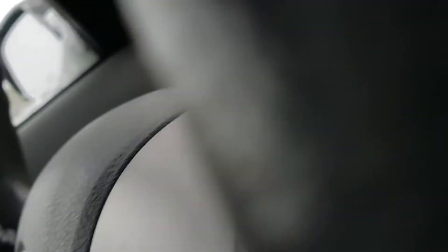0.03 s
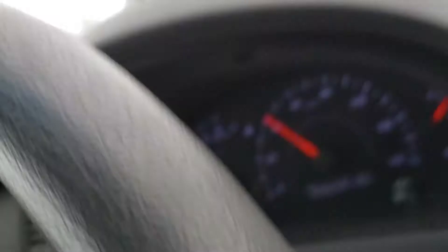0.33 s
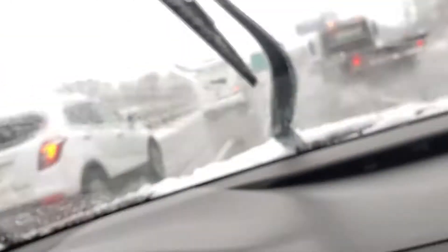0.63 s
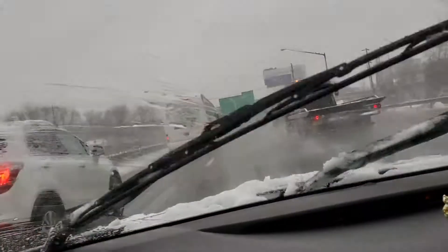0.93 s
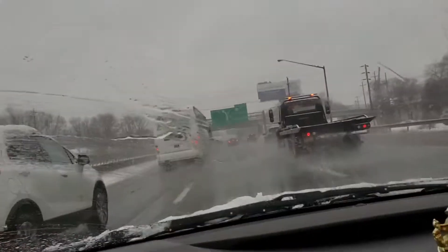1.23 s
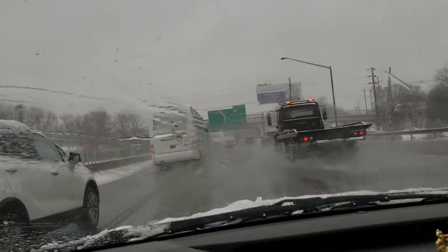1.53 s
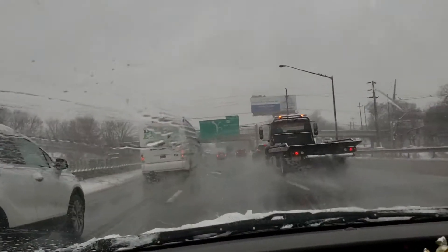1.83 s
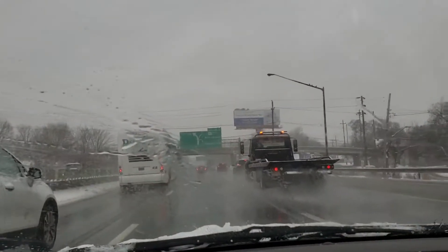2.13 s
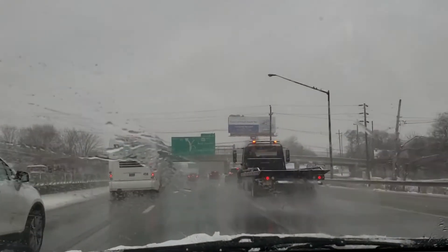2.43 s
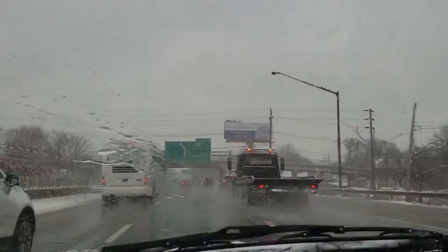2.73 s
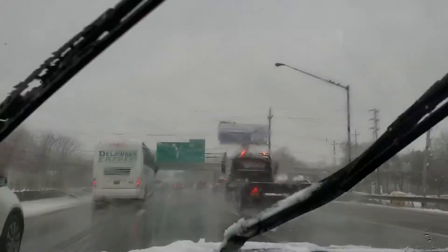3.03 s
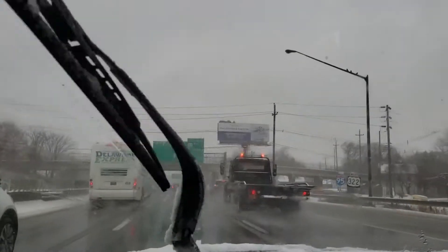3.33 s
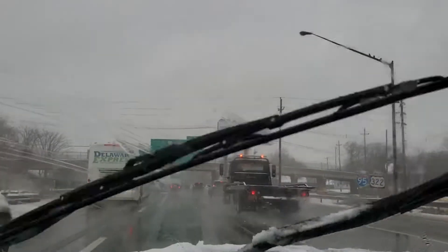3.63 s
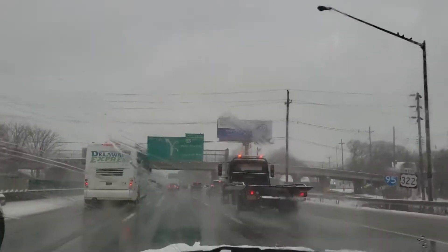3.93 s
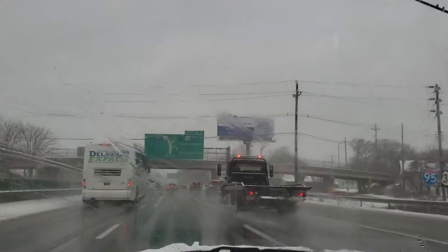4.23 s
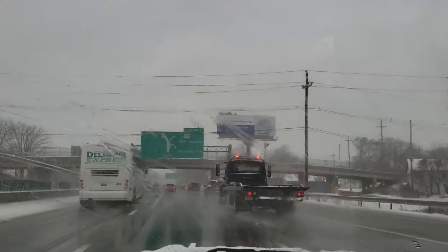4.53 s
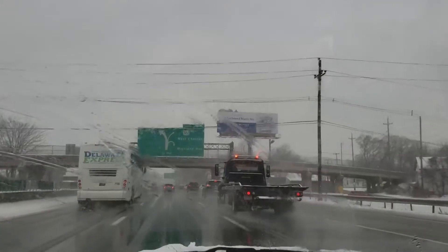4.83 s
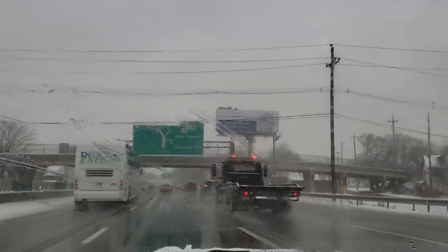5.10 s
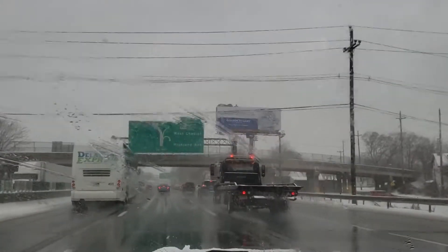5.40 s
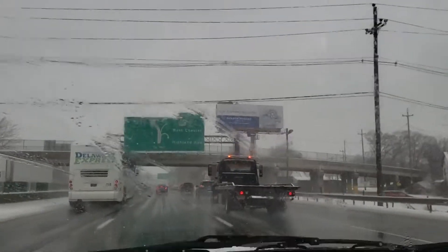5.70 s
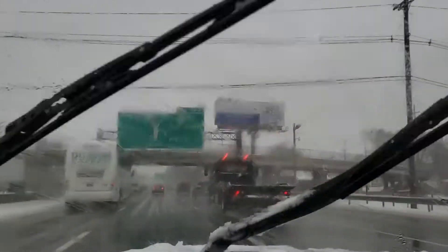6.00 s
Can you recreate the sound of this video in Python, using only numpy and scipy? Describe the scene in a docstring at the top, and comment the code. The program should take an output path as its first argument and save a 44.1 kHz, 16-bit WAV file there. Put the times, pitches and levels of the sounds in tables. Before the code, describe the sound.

A steady low rumble, tyre roar, wet spray hiss and engine hum are heard from inside a car for about six seconds. In the first half second the hand-held phone is swung up with bumps, hollow finger knocks, rubbing, clicks and a dull rush of air, over a soft wiper sweep lasting a second. Small ticks and a thud follow near 1.2 seconds. After a faint squeak at 2.5, the wipers sweep again from 2.8 to 3.8 with a rubbery swish, motor hum and thin whistle. Around 3 seconds a passing vehicle gently swells the roar and hiss, its faint tyre whine sinking near 3.5 as mist fizzes lightly on the glass. The engine hums louder from 3 to 4.5. Dull road thuds come between 2.8 and 3.6, then with plastic ticks from 4.7 to 5. A third wiper sweep starts at 5.7.

```python
"""Car cabin on a wet highway

The cabin booms over the road, tyres roar, spray hisses and the engine hums.
A vehicle passes with a sinking tread whine and throws mist on the glass.
The wipers start three sweeps, wheels thud over joints and plastic trim ticks.
A hand-held phone is swung up at the start; it rumbles, rubs and clicks in the grip."""
import sys
import numpy as np
from scipy import signal
from scipy.fft import rfft, irfft, next_fast_len
from scipy.io import wavfile
from scipy.ndimage import uniform_filter1d, map_coordinates

SR = 44100
rng = np.random.default_rng(int(sys.argv[2]) if len(sys.argv) > 2 else 0)


def store_pcm(level_fs):
    """Save levels as 16-bit WAV."""
    pcm = np.round(np.clip(level_fs, -1, 1) * 32767).astype(np.int16)
    wavfile.write(sys.argv[1], SR, np.atleast_2d(pcm).T)


N = 267246
TIME = np.arange(N) / SR

# Cabin air and body resonances: f/Hz, width/Hz, level/dB
CABIN_MODES = [(43, 16, 2.5), (78.2, 19.6, -6), (104.9, 13, -3.5), (162.6, 15, -20.5)]
# Jolts of body, wiper linkage and hand: t/s, level/dB, length/s, corner/Hz
JOLT_EVENTS = [(0.05, -21, 0.049, 110), (0.103, -16.5, 0.05, 140), (0.156, -19.5, 0.03, 125),
               (0.203, -20, 0.074, 75), (0.296, -17, 0.034, 86), (.361, -23, 0.082, 65),
               (1.135, -31, 0.13, 150), (1.344, -23.5, 0.071, 120), (2.848, -21.5, 0.02, 200),
               (2.915, -29, 0.094, 150), (3.187, -24, 0.031, 100), (3.296, -27, 0.25, 160),
               (3.543, -21, 0.079, 88), (4.721, -22, 0.038, 320), (4.771, -20.5, 0.045, 52),
               (4.901, -20.5, 0.057, 62), (4.968, -23.5, 0.079, 55.3), (5.191, -31, 0.11, 48)]
# Wiper sweeps: t/s, swish/dB, whistle/dB, motor/dB
WIPER_SWEEPS = [(.03, -54, -66, -62), (2.77, -54, -54.5, -49), (5.74, -54.5, -73, -62)]
# Trim and case ticks: t/s, level/dB, treble/dB (-10 = no tilt), L-R/dB, t60/s, resonance/Hz
TICK_EVENTS = [(0.104, -43, -10, -2, 0.092, 4200), (0.3238, -39, -4, 2, 0.066, 4300),
               (0.3265, -40, -22, 5, .02, 4540), (.378, -51, -14, 3, 0.064, 3600),
               (.4595, -49.5, -14, 7, .025, 4200), (0.813, -44.5, -12.5, -1, .07, 3400),
               (1.151, -39.5, -17.5, -2, 0.076, 3350), (1.335, -48, -4, -3, .008, 4200),
               (1.669, -49, -21, -1, .08, 3500), (2.9235, -48, -21, .5, .1, 4150),
               (2.9825, -53, -7, 1, .06, 4200), (3.987, -53, -13, .5, .09, 4200),
               (4.745, -52, -16, 4, .05, 4200), (4.7705, -45.5, -15, 3, .055, 4900),
               (4.8185, -47, -7, .5, .045, 4900), (4.837, -53, -5, 0, 0.04, 4900),
               (4.853, -56, -10, 1, .1, 4200), (5.9602, -49.5, -16, 1.5, .08, 4200)]
# Finger knocks: t/s, level/dB, f/Hz
FINGER_KNOCKS = [(.178, -26, 630), (.387, -30.5, 670), (.419, -27, 697)]
# Finger slides: t/s, level/dB, length/s
FINGER_RUBS = [(0.018, -54.5, 0.095), (0.104, -52, 0.062), (.17, -57, 0.13), (.33, -60.5, 0.24),
               (1.2, -57.5, .069), (3.55, -56, .045), (3.976, -58, .025), (4.313, -57, .012),
               (4.755, -58, 0.04), (4.795, -58, 0.035), (4.84, -65, 0.15), (5.96, -64, 0.085)]
# Relative noise spectra: f/Hz, level/dB
TYRE_SPECTRUM = [(60, -2.5), (140, -3), (210, -2), (330, 0.5), (480, -4.5), (590, -3), (660, -7.5),
                 (740, -4.5), (890, -10.5), (1050, -8.5), (1400, -13.5), (2000, -31), (4000, -62)]
SPRAY_SPECTRUM = [(600, -12.5), (1200, -3), (1650, 0), (2100, -1), (2700, -2), (3400, -3.5), (4100, -6.5),
                  (4800, -15.5), (6000, -19), (7200, -21.5), (8500, -28), (10000, -29), (13000, -28),
                  (16000, -36)]
BLADE_UP_SPECTRUM = [(300, -10), (600, 18), (1100, 26), (1500, 22), (2100, 9), (3600, 19), (5000, 0),
                     (7300, -5), (9000, -9), (13000, 0), (16000, -6)]
BLADE_BACK_SPECTRUM = [(300, 11), (600, 18), (1200, 26), (1800, 16), (3000, 14), (4400, 12), (5200, -2),
                       (7300, 5), (9000, -6.5), (13000, -2), (16000, -6)]
LIP_FLIP_SPECTRUM = [(800, -12), (2000, 6), (3400, -8), (4300, -4), (5500, -20.5), (7200, -8), (8200, -13),
                     (9500, -24), (16000, -24)]
AIR_SPECTRUM = [(60, -6), (140, -3), (210, 1.5), (310, 1), (430, -5.5), (620, -5), (850, -6.5),
                (1100, -10.5), (1500, -16), (2100, -38), (4000, -60)]
PLASTIC_SPECTRUM = [(1500, -22), (2800, -12), (3400, 1), (4200, 3), (4900, -0.5), (6000, -1.5), (7000, -2),
                    (8300, -5.5), (10000, -6.5), (12500, -2.5), (14000, -2), (15500, -3)]
SKIN_SPECTRUM = [(400, -12), (700, 0), (1100, -4), (1500, -6), (2200, 4), (4500, 6), (7200, 2.5),
                 (9500, -6), (11200, 0), (13000, 2), (14200, -2), (15800, -7)]
MIST_SPECTRUM = [(3000, -30), (6000, -1), (10000, -2), (12500, 0), (16000, -5)]
# Likeness of the two microphone ports: f/Hz, correlation
PORT_CORRELATION = [(40, .99), (90, .9), (400, .88), (600, 0.57), (730, 0.1), (950, 0.3), (1150, -0.38),
                    (1520, -0.35), (1750, 0), (2250, 0.37), (2750, -0.08), (5000, 0), (15000, -0.08)]
# Port balance: f/Hz, L-R/dB
PORT_BALANCE = [(40, 3.5), (90, 2.5), (160, 4), (230, 1.5), (580, 1.7), (750, 0.5), (3200, 0.2), (4200, -3),
                (4900, 1), (6000, 0), (7200, 7.5), (8500, -1), (11000, 0.5), (13000, -3.5), (15500, -1)]


def amp(db):
    """Decibels to gain."""
    return 10 ** (np.asarray(db) / 20)


def unit(x):
    """Scale to rms 1."""
    return x / np.sqrt(np.mean(x ** 2) + 1e-20)


def along(points, hz):
    """Interpolate (f/Hz, value) points on a log axis."""
    f, v = np.transpose(points)
    return np.interp(np.log(hz + 1), np.log(f + 1), v)


def colour(points):
    """Response of an (f/Hz, level/dB) spectrum."""
    return lambda hz: amp(along(points, hz))


def wobble(rate_hz):
    """Smooth random curve."""
    return map_coordinates(rng.standard_normal(int(N * rate_hz / SR) + 4), [TIME * rate_hz])


def stroke(t, length_s, edge_s):
    """Linear rise, hold, exponential decay."""
    return np.clip(t / edge_s, 0, 1) * np.exp(-np.maximum(t - length_s, 0) / edge_s)


def filtered(x, response):
    """Apply a complex frequency response."""
    size = next_fast_len(N + SR // 2)
    return irfft(rfft(x, size) * response(np.fft.rfftfreq(size, 1 / SR)), size)[..., :N]


def rush(response, patchy_db):
    """Diffuse stereo noise, rms 1, with patches of random gain."""
    spectra = signal.stft(rng.standard_normal((2, N)), nperseg=512)[2]
    patches = uniform_filter1d(rng.standard_normal(spectra.shape[1:]), size=6, axis=0)
    patches = uniform_filter1d(patches, size=14, axis=1)
    pair = signal.istft(spectra * amp(patchy_db * unit(patches)), nperseg=512)[1][:, :N]
    angle = lambda hz: np.arccos(np.clip(along(PORT_CORRELATION, hz), -1, 1)) / 2
    mid, side = filtered(pair, lambda hz: response(hz) * np.array([np.cos(angle(hz)), np.sin(angle(hz))]))
    return unit(np.array([mid + side, mid - side]))


def fuzzy_tone(hz, width_hz):
    """Tone, rms 1; level and phase wander separately per port."""
    a, b = filtered(rng.standard_normal((2, 2, N)), lambda f: 1 / (1 + (f / width_hz) ** 4))
    phase = 2 * np.pi * np.cumsum(hz * np.ones(N)) / SR
    return unit(a * np.cos(phase) + b * np.sin(phase))


def nearness(before_s, after_s, nearest_s=3.02):
    """Bell curve, 1 when the passing vehicle is nearest."""
    t = TIME - nearest_s
    return np.exp(-(t / np.where(t < 0, before_s, after_s)) ** 2)


def cabin(hz):
    """Response of the cabin's low modes, leaking away below the first."""
    modes = sum(amp(db) * 1j * hz * width / (f * f - hz * hz + 1j * hz * width)
                for f, width, db in CABIN_MODES)
    return modes * (1 - 1 / (1 + (hz / 31) ** 12)) / (1 + (hz / 215) ** 4)


def road(coarsening_db_per_s=0.22, drying_db_per_s=0.16):
    """The road shakes the cabin; tyre roar and spray swell as the vehicle passes."""
    passing_db = 2.5 * nearness(0.39, 1)
    shade_db = 2 * stroke(TIME - 0.14, 0.35, edge_s=0.097)  # a hand shades the ports
    roar_db = -38.5 + coarsening_db_per_s * TIME + passing_db
    spray_db = -45.5 - drying_db_per_s * TIME + passing_db - shade_db
    boom = amp(-31 + 0.45 * wobble(7)) * rush(cabin, patchy_db=0)
    roar = amp(roar_db) * rush(colour(TYRE_SPECTRUM), patchy_db=0.98)
    spray = amp(spray_db) * rush(colour(SPRAY_SPECTRUM), patchy_db=0.82)
    return boom + roar + spray


def jolts(evenness=0.83):
    """Jolts shake the cabin modes; each has its own brightness, from dull thud to knock."""
    out, t = np.zeros(N), np.arange(SR // 2) / SR
    hz = np.fft.rfftfreq(len(t), 1 / SR)
    for start_s, db, length_s, corner_hz in JOLT_EVENTS:
        response = cabin(hz) * (1 + hz / 150) / (1 + (hz / corner_hz) ** 2)
        shake = irfft(rfft(rng.standard_normal(len(t))) * response, len(t))
        # even out chance swells so the push sets the strength
        local_rms = np.sqrt(abs(uniform_filter1d(shake ** 2, size=2000, mode="wrap")))
        push = stroke(t, length_s, edge_s=0.012)
        thud = unit(push * shake / local_rms ** evenness) * np.sqrt(np.mean(push ** 2))
        start = round(start_s * SR)
        out[start:start + len(t)] += amp(db) * thud[:N - start]
    return out


def engine(firing_hz=80.96, drift=0.01214, throttle_db=8):
    """Slightly unsteady firing hum, louder during one push on the throttle."""
    phase = 2 * np.pi * np.cumsum(firing_hz * (1 + drift * wobble(5.01))) / SR
    throttle = stroke(TIME - 3, 1.42, edge_s=0.29)
    return amp(-43 + throttle_db * throttle + 0.69 * wobble(6.6)) * unit(np.sin(phase))


def tread(coming_hz=605, going_hz=560, glide_at_s=3.46, glide_s=0.123):
    """Passing tread blocks slap the road: a blurred note that sinks as they draw away."""
    hz = going_hz + (coming_hz - going_hz) * (1 - np.tanh((TIME - glide_at_s) / glide_s)) / 2
    steady = np.sin(2 * np.pi * np.cumsum(hz + 5 * wobble(20)) / SR)
    note = unit(steady + 0.62 * fuzzy_tone(hz, width_hz=6.4)[0])  # long waves: both ports alike
    octave = amp(-13) * fuzzy_tone(2 * hz, width_hz=11)
    return amp(-52) * nearness(1, 2.3) * (note + octave)


def wipers(sweep_s=1.04, flip_s=0.475, whistle_hz=2030, rise_hz=500, return_db=1):
    """Rubber swishes through water, whistles going up, flips its lip and returns brighter."""
    up, back, whistle, flip = np.zeros((4, N))
    for start_s, swish_db, whistle_db, _ in WIPER_SWEEPS:
        t = TIME - start_s
        progress = np.clip(t / sweep_s, 0, 1)
        speed = np.sin(2 * np.pi * progress)  # positive going up
        turn = np.sin(np.pi * progress)  # sustains the swish at the top
        rub = amp(swish_db + return_db * progress) * np.hypot(speed, turn)
        flipped = np.clip((t - flip_s) / 0.03, 0, 1)
        up += rub * np.sqrt(1 - flipped)
        back += rub * np.sqrt(flipped)
        flip += amp(whistle_db + 8) * stroke(t - flip_s, 0.026, edge_s=0.009)
        hz = whistle_hz + rise_hz * np.minimum(2 * progress, 1) ** 5 + 25 * wobble(8.8)
        whistle += amp(whistle_db) * np.maximum(speed, 0) * fuzzy_tone(hz, width_hz=60)[0]
    swish = up * rush(colour(BLADE_UP_SPECTRUM), patchy_db=1.5)
    swish += back * rush(colour(BLADE_BACK_SPECTRUM), patchy_db=1.5)
    flutter = amp(2 * wobble(35))
    return flutter * (swish + whistle) + flip * rush(colour(LIP_FLIP_SPECTRUM), patchy_db=0)


def wiper_motor(start_hz=613, sag_hz_per_s=30.2, delay_s=0.043, load_s=0.55):
    """Rough motor hum, slowing under the load of the blades."""
    out = np.zeros(N)
    for start_s, _, _, db in WIPER_SWEEPS:
        t = TIME - start_s - delay_s
        hz = start_hz - sag_hz_per_s * np.clip(t, 0, 1) + 5 * wobble(22)
        hum = np.sin(2 * np.pi * np.cumsum(hz) / SR) + fuzzy_tone(hz, width_hz=16)[0]
        out += amp(db) * stroke(t, load_s, edge_s=0.049) * unit(hum)
    return out


def phone_swing(length_s=0.24, fade_s=0.12):
    """Dull rush of air on the ports, fading as the phone comes to rest."""
    motion = np.exp(-np.maximum(TIME - length_s, 0) / fade_s)
    return amp(-36.5) * motion * rush(colour(AIR_SPECTRUM), patchy_db=1.3)


def knocks(t60_s=0.045, rise_s=0.0013):
    """A fingertip gives the phone a short, hollow ring."""
    out, t = np.zeros(N), np.arange(SR // 10) / SR
    for start_s, db, hz in FINGER_KNOCKS:
        envelope = amp(db - 60 * t / t60_s) * (1 - np.exp(-t / rise_s))
        out[round(start_s * SR):][:len(t)] += envelope * np.sin(2 * np.pi * hz * t)
    return out


def ticks(rise_s=0.0024, ring_db=7.5, ring_width_hz=120):
    """Small plastic contacts: damped scrapes, each with its own resonance."""
    out, t = np.zeros((2, N + SR)), np.arange(SR // 8) / SR
    hz = np.fft.rfftfreq(len(t), 1 / SR)
    for start_s, db, treble_db, pan_db, t60_s, ring_hz in TICK_EVENTS:
        envelope = np.minimum(t / rise_s, 1) * amp(-60 * np.maximum(t - rise_s, 0) / t60_s)
        tilt = amp((treble_db + 10) * along([(7000, 0.058), (12000, 0.93)], hz))
        resonance = amp(ring_db / (1 + ((hz - ring_hz) / ring_width_hz) ** 2))
        response = colour(PLASTIC_SPECTRUM)(hz) * resonance * tilt
        scrape = unit(irfft(rfft(rng.standard_normal((2, len(t)))) * response, len(t)))
        pan = amp([[pan_db / 2], [-pan_db / 2]])
        out[:, round(start_s * SR):][:, :len(t)] += amp(db) * pan * scrape * envelope
    return out[:, :N]


def grip(slips_per_s=1800, slip_s=0.0012, spread_db=2.5):
    """Skin sticks and slips on the case in many tiny, uneven steps."""
    pressure = sum(amp(db) * stroke(TIME - start_s, length_s, edge_s=0.0098)
                   for start_s, db, length_s in FINGER_RUBS)
    slip_energy = (rng.random(N) < slips_per_s / SR) * amp(spread_db * rng.standard_normal(N)) ** 2
    grain = np.sqrt(signal.lfilter([1], [1, -np.exp(-1 / (slip_s * SR))], slip_energy))
    return pressure * unit(grain) * rush(colour(SKIN_SPECTRUM), patchy_db=1)


def squeak(start_s=2.5, length_s=0.027, hz=2570):
    """A faint, brief high chirp, just before the second wiper sweep."""
    return amp(-52) * stroke(TIME - start_s, length_s, edge_s=0.009) * fuzzy_tone(hz, width_hz=25)[0]


def drone(start_s=3.88, length_s=1.45, hz=390.5):
    """A faint, blurred note rises out of the roar."""
    return amp(-49) * stroke(TIME - start_s, length_s, edge_s=0.37) * fuzzy_tone(hz, width_hz=20)[0]


def mist(start_s=2.84, length_s=0.66):
    """Droplets in the vehicle's wake fizz on the windscreen and thin out."""
    wake = stroke(TIME - start_s, length_s, edge_s=0.35)
    return amp(-65.5 + 1.5 * wobble(60)) * wake * rush(colour(MIST_SPECTRUM), patchy_db=4)


def ports(hz, bass_hz=200, lag_s=0.00034):
    """Each port has its own colour; bass reaches the left one later."""
    lag_rad = 2 * np.pi * hz * lag_s / (1 + (hz / bass_hz) ** 4)
    balance = amp(np.outer([1, -1], along(PORT_BALANCE, hz)) / 2)
    return balance * np.exp(1j * np.outer([-1, 1], lag_rad) / 2)


def scene():
    """All sources at the two ports."""
    car = road() + tread() + engine() + jolts() + wipers() + wiper_motor()
    handling = phone_swing() + grip() + knocks()
    background = mist() + squeak() + drone()
    return ticks() + filtered(car + handling + background, ports)


def record(dry, low_hz=28, top_hz=15830):
    """The phone cuts deep bass and everything above its band limit."""
    return filtered(dry, lambda hz: (1 - 1 / (1 + (hz / low_hz) ** 10)) * (hz < top_hz))


dry = scene()
out = record(dry)
store_pcm(out)
```